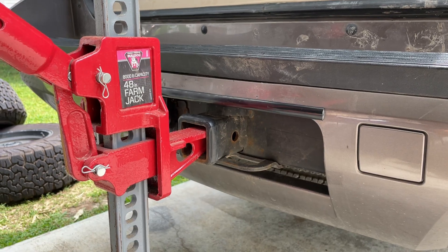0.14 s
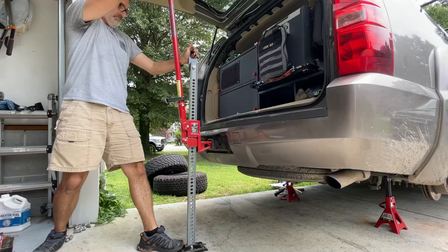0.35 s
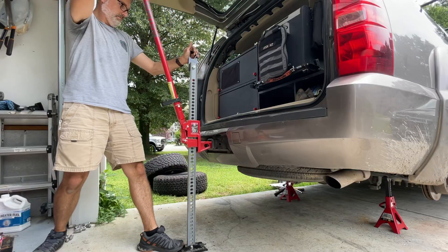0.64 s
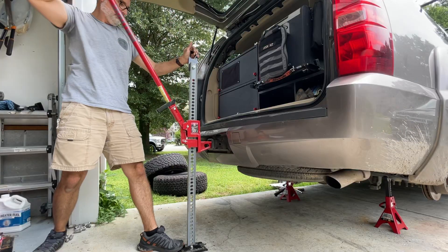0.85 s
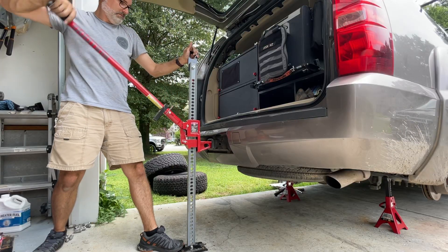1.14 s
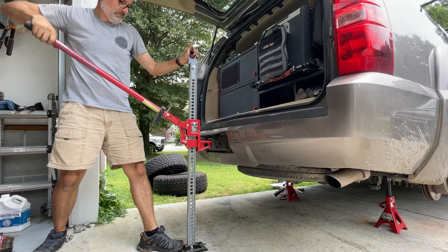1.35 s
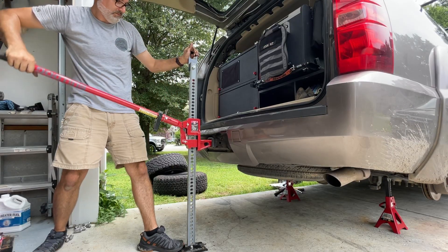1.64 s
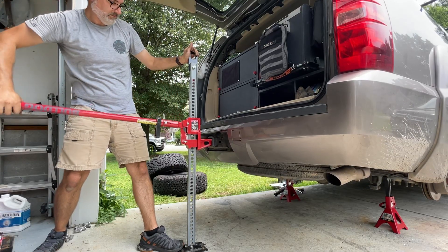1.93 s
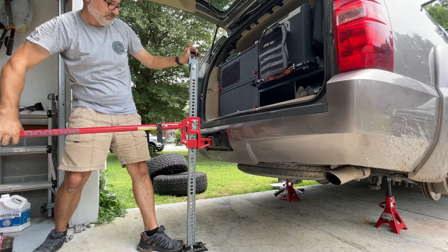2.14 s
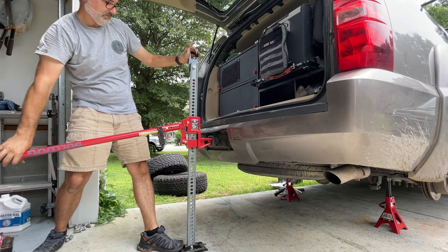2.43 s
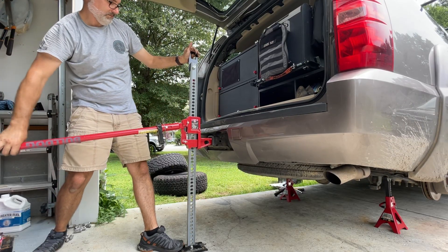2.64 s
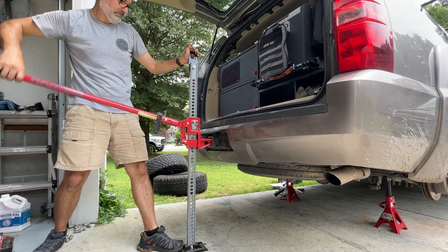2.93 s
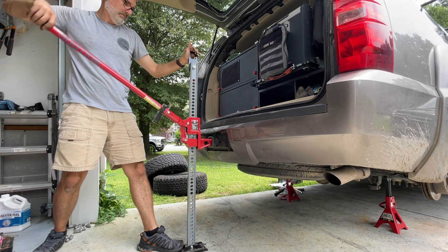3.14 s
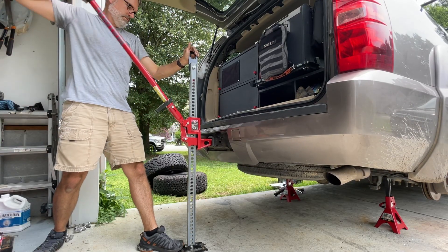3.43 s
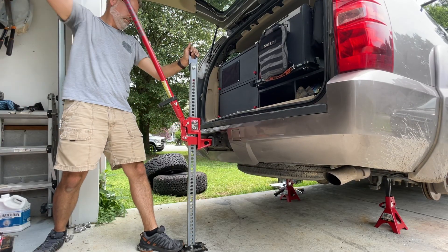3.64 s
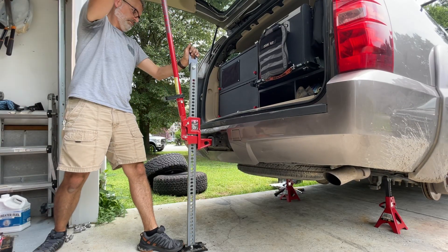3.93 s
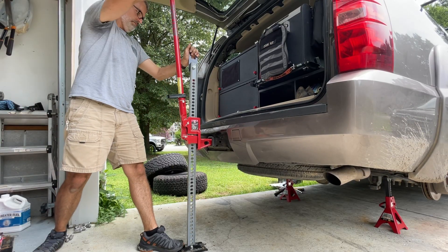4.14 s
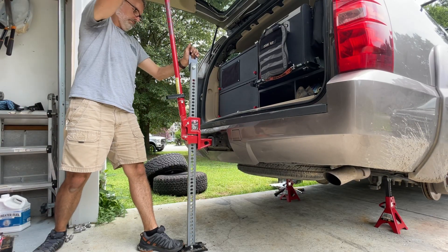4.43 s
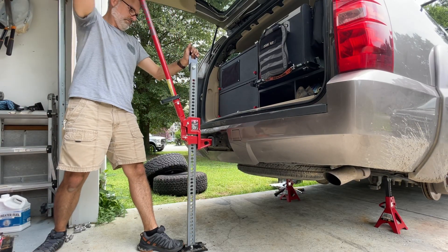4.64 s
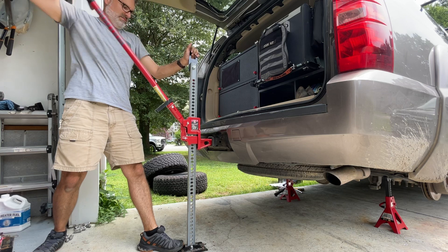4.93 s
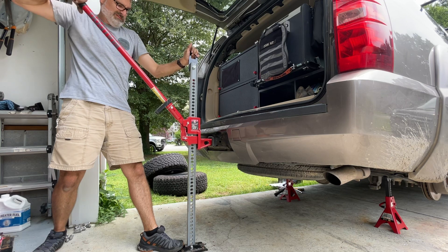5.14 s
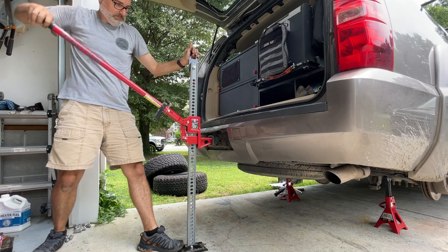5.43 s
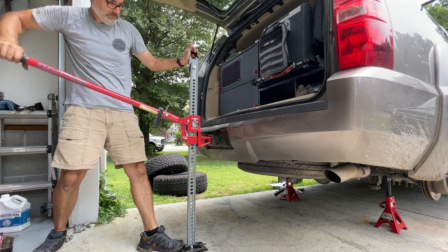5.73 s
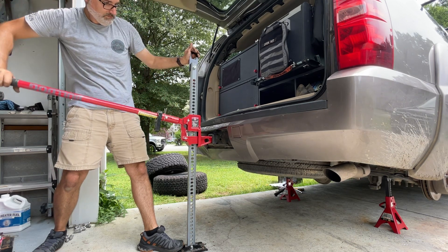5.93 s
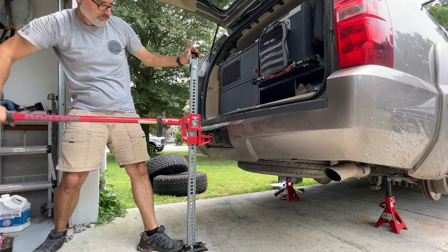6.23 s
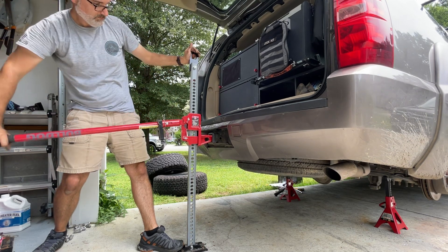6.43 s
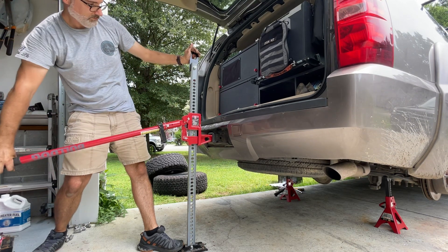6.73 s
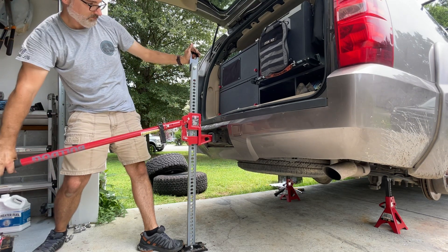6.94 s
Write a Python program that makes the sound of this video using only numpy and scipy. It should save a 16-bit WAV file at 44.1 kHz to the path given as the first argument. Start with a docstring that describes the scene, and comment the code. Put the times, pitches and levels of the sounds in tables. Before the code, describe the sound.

A close microphone hears a hand-operated steel jack raising the back of a heavy vehicle outside an open garage. Very quiet air opens the scene, and a low outdoor rumble with soft rush rises slightly. From 0.3 to 1.7 seconds, small dull clunks and low thumps come from the linkage, clustered around 0.5 and 1.2. At 2.08 a pin slips and slams home: a loud, bright, clattering steel crack with short ringing and a garage echo under half a second long. Around 2.9 to 3.1, crisper knocks and springy ticks sound as the load shifts. A lighter, sharper, higher click comes at 3.89. Faint ticks and muffled knocks follow from 4.1, with a clearer clunk at 5.0. At 6.26 the second loud snap hits, brighter, with a rebound and rattle, then a soft knock at 6.4 and fading ambience to 7 seconds. A barely audible thin whine swells occasionally.

```python
"""A spring-loaded climbing pin of a steel farm jack slips free, rings, and snaps into a hole of the upright bar.
This happens at the end of each stroke, as the jack lifts the back of a heavy vehicle on a driveway.
Pin and bar are sums of decaying modes with coloured noise bursts; between snaps the load shifts with dull clunks
(filtered bursts and a low boom), and small ticks (narrow resonances) sound at snaps and between them. An open garage
echoes it all by convolution with decaying noise, over noise-made air, low outdoor rumble, soft rush and a thin whine."""
import sys
import numpy as np
from scipy import signal
from scipy.fft import rfft, irfft
from scipy.io import wavfile
from scipy.ndimage import uniform_filter1d

SR = 44100
rng = np.random.default_rng(int(sys.argv[2]) if len(sys.argv) > 2 else 0)


def wrap_up_sound(samples):
    """Save the sound to the file named by the first command line argument, as 16-bit audio."""
    columns = np.atleast_2d(samples).T
    # keep every value between -1 and 1, then stretch to whole-number steps
    tamed = np.clip(columns, -1, 1)
    steps = np.round(tamed * 32767).astype(np.int16)
    wavfile.write(sys.argv[1], SR, steps)


N = 312476
TIME = np.arange(N) / SR
BLOW_TIME = np.arange(SR // 2) / SR  # time within one blow
TOP_HZ = 15850  # upper limit of the audible band here

# Snaps of the lower pin, at the bottom of a stroke, and of the upper pin, at the top.
# Each row: blow in seconds, lead of the slips in seconds, slip level in dB, pin ring in dB,
# blow on the bar in dB, brightness in dB per octave, delay of the rebound in seconds.
LOWER_SNAPS = [(2.0846, .0122, -13.5, -9.5, -5.5, -1, .0045), (6.2590, .017, -14, -8, -4.5, 0.86, .0148)]
UPPER_SNAPS = [(3.8893, 0.0088, -31, -15.5, -14, .7, .004)]
SLIP_GAP_S, SLIP_BAR_DB = .004, -21.5  # a pin leaves in two slips that barely stir the bar
SEAT_S = .002  # from its first blow until it is fully home
PIN_REBOUND_DB, PIN_REBOUND_TILT_DB = -9.5, -5  # the rebound is weaker and duller (dB per octave)

# Modes of the pins. Each row: frequency in Hz, relative level in dB, t60 in seconds.
LOWER_PIN_MODES = [(2082, -15.5, 0.14), (2870, -19, .05), (4400, -26, 0.052), (6186, -3, 0.051),
                   (6255, -5, 0.067)]
UPPER_PIN_MODES = [(2305, -1.5, 0.037), (3994, -1, 0.042), (4380, -7.5, .07), (5500, -7.5, 0.061),
                   (8820, -10, 0.023), (9300, -9, 0.087), (10160, -3.5, .05), (10740, -9.5, 0.098),
                   (15800, -7.5, 0.077)]
# Crowded resonances of bar and runner under each pin. Each row: frequency in Hz, relative level in dB.
LOWER_BAR = [(100, -34.5), (400, -31), (700, -15), (1200, -11.5), (2200, -8), (3100, 2.5), (4000, 1.5),
             (5000, -3), (6200, -7), (7000, -9), (8500, -14.5), (12000, -14.5), (15500, -21)]
UPPER_BAR = [(100, -18), (600, -18.5), (1200, -10), (2500, -5.5), (4200, -1), (6200, -2), (8200, -8),
             (10000, -11), (13500, -20), (15500, -17)]
# Clear modes of bar and runner under each pin. Each row: frequency in Hz, relative level in dB, t60 in seconds.
LOWER_BAR_MODES = [(1678, -22.5, 0.31), (2834, -20.5, .2), (3143, -16, 0.12), (3360, -19.5, 0.14),
                   (3590, -23, 0.46), (3815, -14, 0.22), (4010, -17, 0.092), (4360, -21.5, 0.14),
                   (4990, -26, 0.28), (5730, -18, 0.12), (5810, -18, 0.22), (6280, -20.5, 0.15),
                   (8600, -34, .22), (10080, -19.5, 0.21), (11750, -33.5, .25)]
UPPER_BAR_MODES = [(1468, -35, 0.27), (3087, -18, 0.1), (3850, -16, 0.1604), (5730, -19.5, 0.094),
                   (6900, -22.5, 0.16), (7540, -18, 0.12), (11160, -12, 0.048), (11800, -14, 0.048),
                   (13200, -22.5, .08)]

# The linkage takes or sheds the load. Each row: start in seconds, relative level in dB,
# dull above this frequency in Hz, decay constant in seconds, thump of the vehicle in dB.
CLUNKS = [(.306, -43, 2500, 0.019, -35), (.515, -30, 2860, 0.021, -34), (.528, -25.5, 2120, 0.018, -41),
          (.599, -36, 1160, 0.18, -44), (1.061, -34.5, 3030, 0.027, -50), (1.168, -30, 3180, 0.012, -44),
          (1.184, -27, 3500, 0.017, -37), (1.254, -36, 5450, .012, -39.5), (1.661, -44.5, 1200, .011, -47),
          (2.897, -29, 3060, .01, -49), (2.903, -21, 5200, 0.014, -37.5), (2.966, -36.5, 7660, 0.044, -55),
          (3.035, -35.5, 6300, 0.021, -38.5), (3.126, -39.5, 2270, 0.026, -45),
          (4.379, -38.5, 1930, .025, -57), (4.418, -38, 1520, 0.051, -62), (4.463, -49.5, 3570, .02, -52),
          (4.876, -44, 900, .012, -42.5), (4.911, -45.5, 6200, 0.021, -62),
          (4.948, -34.5, 2600, 0.048, -64), (4.996, -23.5, 3300, 0.012, -37.5),
          (5.055, -50, 900, .022, -36), (6.439, -36, 800, .02, -44)]
# Each clunk knocks back once: later (s), weaker (dB), duller and more drawn out (ratios).
KNOCK_BACK_S, KNOCK_BACK_DB, KNOCK_BACK_DULLING, KNOCK_BACK_STRETCH = .014, -5, 0.78, 1.8
# Crowded resonances of the linkage. Each row: frequency in Hz, relative level in dB.
LINKAGE = [(60, -3), (250, -2.5), (500, -4), (1000, -1), (1800, -1.5), (3000, -3), (3800, -0.5),
           (4400, -12.5), (5000, -6), (6300, 2.5), (9000, -4), (15000, -10.5)]
# Clear modes of the linkage. Each row: frequency in Hz, relative level in dB, t60 in seconds.
LINKAGE_MODES = [(1019, -17, 0.29), (1415, -30, 0.16), (1986, -7, 0.067), (2174, -8, 0.045),
                 (3103, -3, 0.061), (4417, -9, 0.11), (5906, -11, 0.038)]
# Boom of the vehicle's body. Each row: frequency in Hz, relative level in dB.
VEHICLE = [(25, -33), (45, -5), (75, 6.5), (130, -6.5), (220, -7), (400, -13.5), (1000, -23), (10000, -109)]
# Clear modes of the vehicle's body. Each row: frequency in Hz, relative level in dB, t60 in seconds.
VEHICLE_MODES = [(74.4, -2.5, 0.24), (215, -11.5, 0.55)]

# Resonances of the jack's parts. Each row: frequency in Hz, relative level in dB, width of one filter pass in Hz.
LOOSE_PIN = [(2077, 0, 180), (5900, -10.5, 600)]
SPRING = [(7240, 1, 680), (9100, -12, 2900), (14200, -20, 1500)]
CLIP = [(3970, 0, 840)]
HANDLE = [(1466, 0, 150)]
RUNNER = [(1180, -11, 400), (3150, -9, 700), (6350, 0, 400), (10100, -8, 250)]
# Brief resonant chatter of the jack's parts, at pin blows and between them.
# Each row: start in seconds, relative level in dB, part.
CHATTER = [(0.78, -55.5, CLIP), (1.194, -43, SPRING), (1.256, -32.5, LOOSE_PIN), (1.497, -62, LOOSE_PIN),
           (2.086, -12.5, RUNNER), (2.904, -26, LOOSE_PIN), (2.902, -29, HANDLE), (2.965, -29.5, SPRING),
           (3.221, -47.5, CLIP), (4.061, -42.5, SPRING), (4.064, -44, HANDLE), (4.911, -48, LOOSE_PIN),
           (4.941, -57, SPRING), (4.995, -35.5, CLIP), (5.391, -57, LOOSE_PIN), (6.261, -12.5, LOOSE_PIN),
           (6.262, -19, CLIP), (6.532, -48, LOOSE_PIN)]

# Echo of the garage. Each row: band centre in Hz, relative level in dB, t60 in seconds.
GARAGE = [(100, -8, 0.35), (500, 5.5, 0.45), (1200, 3, 0.47), (3520, -3, 0.51), (7000, 0, 0.5),
          (10000, -3.5, 0.38), (14000, -8.5, 0.21)]
# Spectra of the steady air, the rumble and the rush. Each row: frequency in Hz, relative level in dB.
AIR = [(25, -21.5), (80, 1.5), (217, -19.5), (320, -31.5), (936, -33.5), (1520, -32), (2110, -40),
       (2800, -36), (3450, -32.5), (4500, -39), (6560, -32.5), (8800, -49), (11000, -58.5), (16000, -75)]
RUMBLE = [(22, -36.5), (45, 1), (58, -2.5), (76, 5.5), (110, 1), (220, 0.5), (330, -10.5), (600, -24.5),
          (2000, -54), (12000, -87.5)]
RUSH = [(150, -15.5), (400, -5), (900, 3.5), (1300, -5.5), (2200, -18), (8000, -28), (13000, -59.5)]
# The background comes up, holds and slowly fades.
# Each row: time in seconds, relative rumble level in dB, soft rush level in dB.
BACKGROUND = [(0, -71, -64.5), (.22, -68.5, -65), (.53, -57, -55.5), (1.4, -50, -59.5), (2.3, -52.5, -56.5),
              (2.85, -48, -56), (3.6, -52.5, -59.5), (5.1, -53.5, -63.5), (6.1, -59.5, -66.5),
              (7.09, -61.5, -66.5)]
# Swells of the whine. Each row: middle in seconds, half length in seconds, level in dB.
WHINE = [(.93, 0.096, -66.5), (1.472, 0.14, -64), (2.82, 0.12, -67.5), (4.65, 0.088, -61.5),
         (5.55, 0.0567, -69.5), (5.985, 0.11, -69.5)]
WHINE_HZ = 1713


def snaps(strokes):
    """Successive impacts of a sprung mass: two slips, the blow, the seating and one rebound."""
    for s, lead_s, slip_db, ring_db, bar_db, bright_db, rebound_s in strokes:
        for slip_s in (s - lead_s, s - lead_s + SLIP_GAP_S):
            yield slip_s, slip_db, slip_db + SLIP_BAR_DB, bright_db
        for blow_s in (s, s + SEAT_S):
            yield blow_s, ring_db, bar_db, bright_db
        yield s + rebound_s, ring_db + PIN_REBOUND_DB, bar_db + PIN_REBOUND_DB, bright_db + PIN_REBOUND_TILT_DB


def pin(blows, modes, bar, bar_modes, crack_s, shudder_s, shudder_db):
    """Impact excitation: each contact rings the pin's modes, and the bar cracks, shudders and rings on."""
    out = np.zeros(N)
    hz, db = np.transpose(bar)
    for s, ring_db, bar_db, bright_db in blows:
        crack = burst(crack_s, 0.0014)
        shudder = undb(shudder_db) * burst(shudder_s, .003)
        tilted = np.column_stack([hz, db + bright_db * np.log2(hz)])  # a squarer blow is brighter
        bar_sound = colour(crack + shudder, tilted) + ring(bar_modes, jostle_hz=28.1)
        add(out, s, undb(ring_db) * ring(modes) + undb(bar_db) * bar_sound)
    return out


def knocks(clunks):
    """Backlash: a joint with play gives a clunk and then a softer knock back."""
    for s, db, dull_hz, decay_s, thump_db in clunks:
        yield s, db, dull_hz, decay_s, thump_db
        yield (s + KNOCK_BACK_S, db + KNOCK_BACK_DB, dull_hz * KNOCK_BACK_DULLING,
               decay_s * KNOCK_BACK_STRETCH, thump_db + KNOCK_BACK_DB)


def linkage(ring_db=-2, thump_s=0.048, grit_db=3):
    """Stick-slip: loaded joints shift in tiny slips, duller for softer contacts, and the vehicle's body booms."""
    out = np.zeros(N)
    for s, db, dull_hz, decay_s, thump_db in knocks(CLUNKS):
        grit = undb(grit_db * walk(500, size=len(BLOW_TIME)))
        slips = burst(decay_s, 0.00063) * grit
        knock = colour(slips, LINKAGE) + undb(ring_db) * ring(LINKAGE_MODES)
        soft = signal.butter(3, min(dull_hz, TOP_HZ), fs=SR, output="sos")
        add(out, s, undb(db) * signal.sosfilt(soft, knock))
        boom = colour(burst(thump_s, 0.01834), VEHICLE) + ring(VEHICLE_MODES, jostle_hz=3, rise_s=0.043)
        add(out, s, undb(thump_db) * boom)
    return out


def ticks(decay_s=0.014):
    """Resonance: parts of the jack chatter briefly, a burst passing twice through each resonance of the part."""
    out = np.zeros(N)
    for s, db, part in CHATTER:
        for hz, mode_db, width_hz in part:
            b, a = signal.iirpeak(min(hz, TOP_HZ), hz / width_hz, fs=SR)
            once = signal.lfilter(b, a, burst(decay_s, 0.00042))
            tick = signal.lfilter(b, a, once)
            strength = np.sqrt(np.sum(tick ** 2) / (decay_s * SR / 2))  # equal energy before levels
            add(out, s, undb(db + mode_db) * tick / strength)
    return out


def garage(x, wet_db, delay_s=.018, build_s=0.0067):
    """Diffuse reverberation of garage and vehicle underside: noise decays at its own rate in each band."""
    hz, db, t60 = np.transpose(GARAGE)
    t, bins = np.arange(SR) / SR, np.fft.rfftfreq(SR, 1 / SR)
    noise, tail = rfft(rng.standard_normal(SR)), 0
    for share, band_db, band_t60 in zip(np.eye(len(hz)), db, t60):
        # neighbouring bands crossfade along log frequency
        weight = np.interp(np.log(bins + 1), np.log(hz), share)
        band = irfft(noise * weight, SR)
        tail = tail + band * undb(band_db) * np.exp(-np.log(1000) * t / band_t60)
    tail *= 1 - np.exp(-np.maximum(t - delay_s, 0) / build_s)
    return undb(wet_db) * signal.fftconvolve(x, tail / np.linalg.norm(tail))[:N]


def outdoors(air_db=-55.5, rumble_db=3, flutter_db=2):
    """Broadband ambient noise: steady air, a fluttering low rumble and a soft rush, each with its own spectrum."""
    s, *columns = np.transpose(BACKGROUND)
    low_db, rush_db = (np.interp(TIME, s, c) for c in columns)
    air = undb(air_db) * colour(rng.standard_normal(N), AIR)
    rumble_level = undb(low_db + rumble_db + flutter_db * walk(8))
    rumble = rumble_level * colour(rng.standard_normal(N), RUMBLE)
    rush_level = undb(rush_db + 1.2 * walk(3.8))
    rush = rush_level * colour(rng.standard_normal(N), RUSH)
    return air + rumble + rush


def whine(octave_db=-8, waver=0.0011, steady_db=-79, wander_db=3):
    """Frequency modulation: a faint tone and its octave waver in pitch, drift in level and swell a few times."""
    phase = 2 * np.pi * np.cumsum(WHINE_HZ * (1 + waver * walk(28))) / SR
    swells = sum(undb(db) * np.exp(-((TIME - s) / half_s) ** 2) for s, half_s, db in WHINE)
    level = swells + undb(steady_db + wander_db * walk(4.3))
    return level * (np.sin(phase) + undb(octave_db) * np.sin(2 * phase))


def ring(modes, jostle_hz=20, rise_s=0.00052):
    """Modal decay: partials of a struck body, each line widened by loose contacts that jostle its phase."""
    hz, db, t60 = np.transpose(modes)[:, :, None]
    steps = rng.standard_normal((len(hz), len(BLOW_TIME)))
    jostle = np.cumsum(steps, axis=1) * np.sqrt(2 * np.pi * jostle_hz / SR)
    phase = 2 * np.pi * (hz * BLOW_TIME + rng.random(hz.shape)) + jostle
    partials = undb(db) * np.exp(-np.log(1000) * BLOW_TIME / t60) * np.sin(phase)
    # the jostling stays near the partials: little spreads far below the lowest or above the highest
    edges = [hz.min() / 2, min(1.15 * hz.max(), TOP_HZ)]
    band = signal.butter(3, edges, "bandpass", fs=SR, output="sos")
    return signal.sosfilt(band, partials.sum(axis=0)) * (1 - np.exp(-BLOW_TIME / rise_s))


def burst(decay_s, rise_s):
    """High modal density: many crowded resonances, starting together and dying away, act as decaying noise."""
    envelope = np.exp(-BLOW_TIME / decay_s) * (1 - np.exp(-BLOW_TIME / rise_s))
    return rng.standard_normal(len(BLOW_TIME)) * envelope


def colour(x, points, size=4096):
    """Minimum-phase filtering through (Hz, dB) points, by a folded cepstrum; white noise keeps its power."""
    hz, db = np.transpose(points)
    bins = np.fft.rfftfreq(size, 1 / SR)
    gain = undb(np.interp(np.log(bins + 1), np.log(hz), db))
    cepstrum = irfft(np.log(unit(gain)))
    cepstrum[1:size // 2] *= 2
    cepstrum[size // 2 + 1:] = 0
    return signal.fftconvolve(x, irfft(np.exp(rfft(cepstrum))))[:len(x)]


def walk(rate, size=N):
    """Smoothed random drift: a moving average over values drawn at a rate in Hz, with a spread near 1."""
    k = int(SR / rate)
    return uniform_filter1d(np.repeat(rng.standard_normal(size // k + 1), k), k)[:size]


def undb(db):
    """Logarithmic level: decibels to amplitude gain."""
    return 10 ** (np.asarray(db) / 20)


def unit(x):
    """Normalization: scale to rms 1."""
    return x / np.sqrt(np.mean(x ** 2))


def add(out, s, sound):
    """Superposition: mix a sound in at time s."""
    i = max(int(s * SR), 0)
    out[i:i + len(sound)] += sound[:N - i]


def scene():
    """Superposition of the jack, its echo and the open air."""
    lower = pin(snaps(LOWER_SNAPS), LOWER_PIN_MODES, LOWER_BAR, LOWER_BAR_MODES,
                crack_s=0.0078, shudder_s=0.025, shudder_db=-9.0)
    upper = pin(snaps(UPPER_SNAPS), UPPER_PIN_MODES, UPPER_BAR, UPPER_BAR_MODES,
                crack_s=.004, shudder_s=0.021, shudder_db=-8.5)
    clunks, chatter = linkage(), ticks()
    # each part faces the garage differently
    to_garage = lower + undb(-1.0) * upper + undb(-3) * clunks + undb(-6) * chatter
    echo = garage(to_garage, wet_db=-12.5)
    return (lower + upper + clunks + chatter + echo + outdoors() + whine())[None]


def record(dry, limit_db=-5, release_s=0.28):
    """Peak limiting: peaks above the limit duck everything, the level recovers slowly, and the top is cut."""
    peak = np.maximum(np.abs(dry[0]), 1e-9)
    # the running peak falls exponentially until a higher one replaces it
    held = np.exp(np.maximum.accumulate(np.log(peak) + TIME / release_s) - TIME / release_s)
    gain = uniform_filter1d(np.minimum(1, undb(limit_db) / held), size=128)
    top_cut = signal.ellip(10, .2, 80, TOP_HZ, fs=SR, output="sos")
    return signal.sosfilt(top_cut, dry * gain)


dry = scene()
out = record(dry)
wrap_up_sound(out)
```